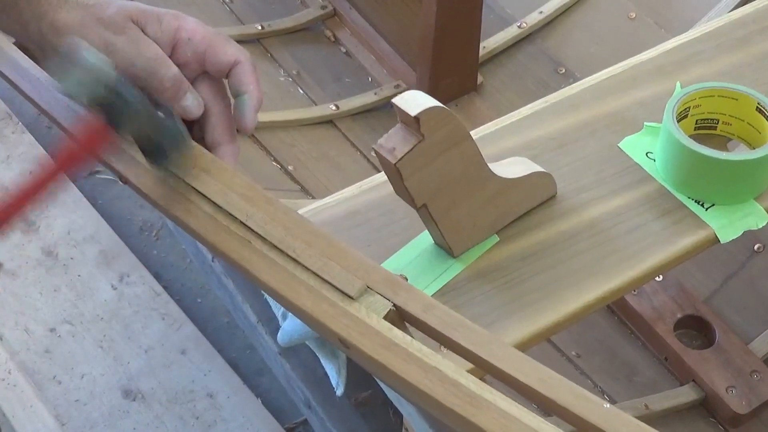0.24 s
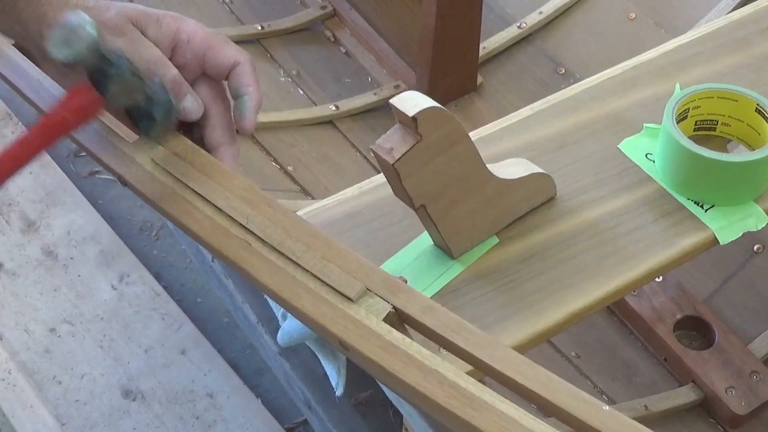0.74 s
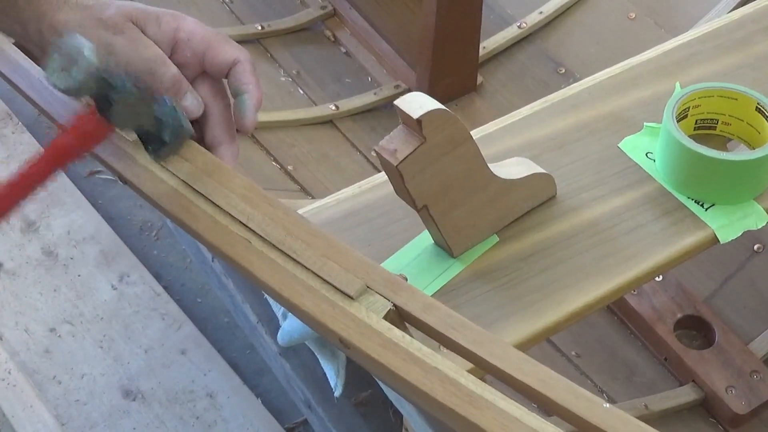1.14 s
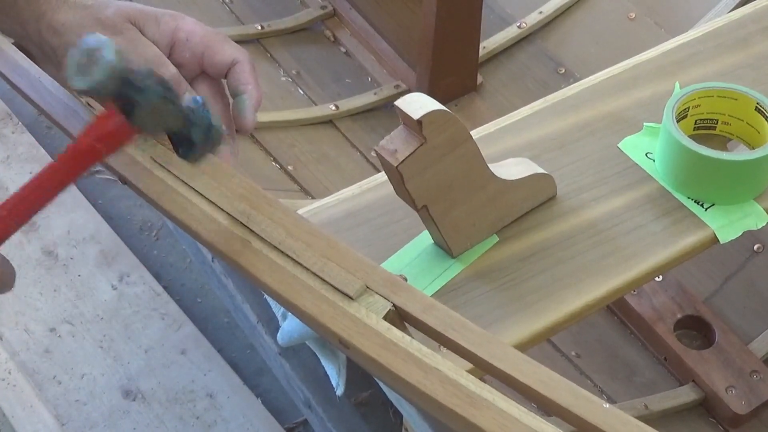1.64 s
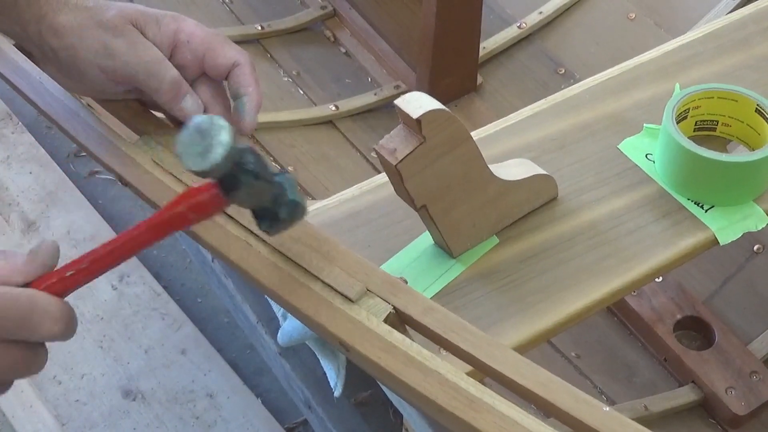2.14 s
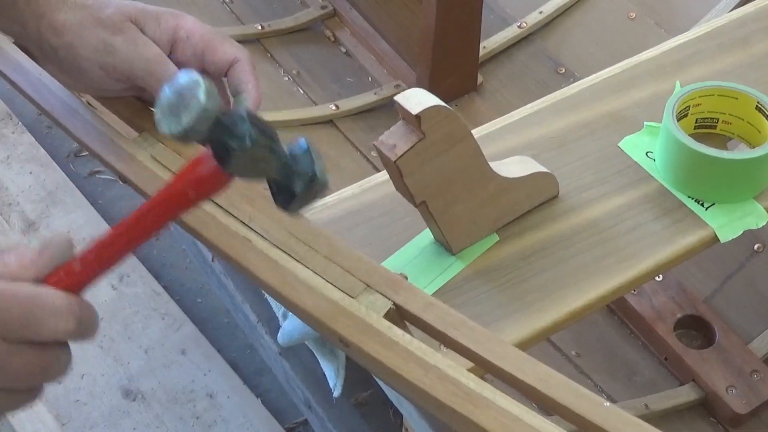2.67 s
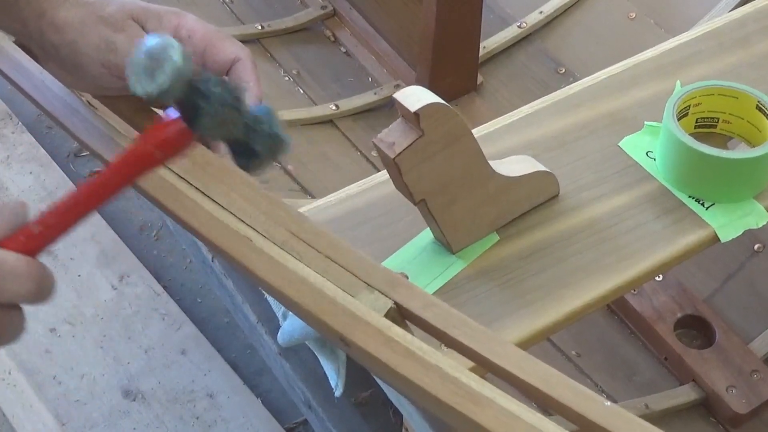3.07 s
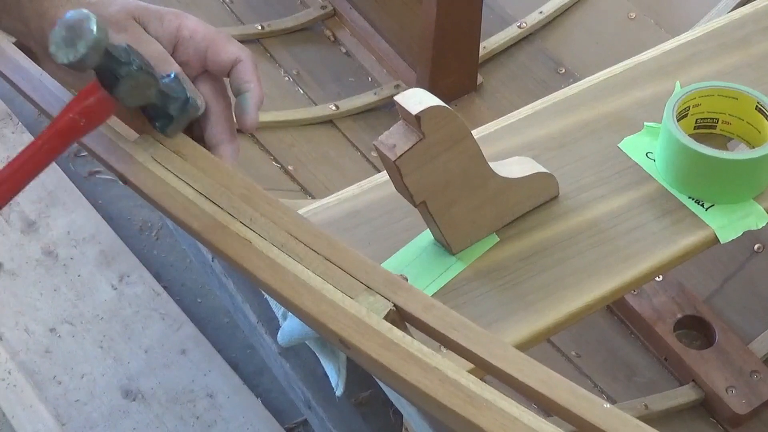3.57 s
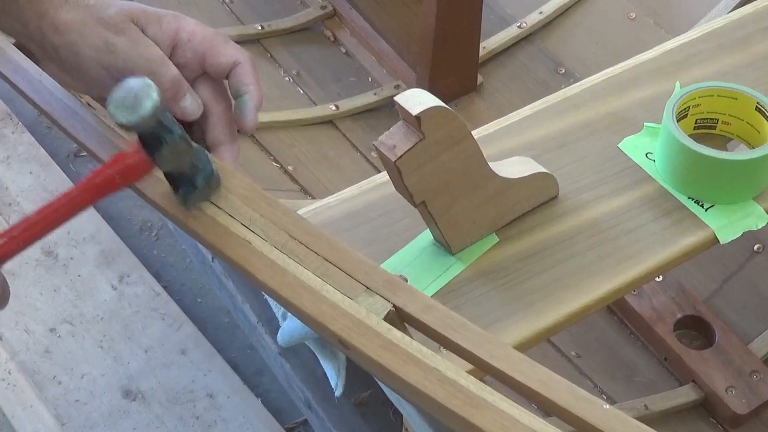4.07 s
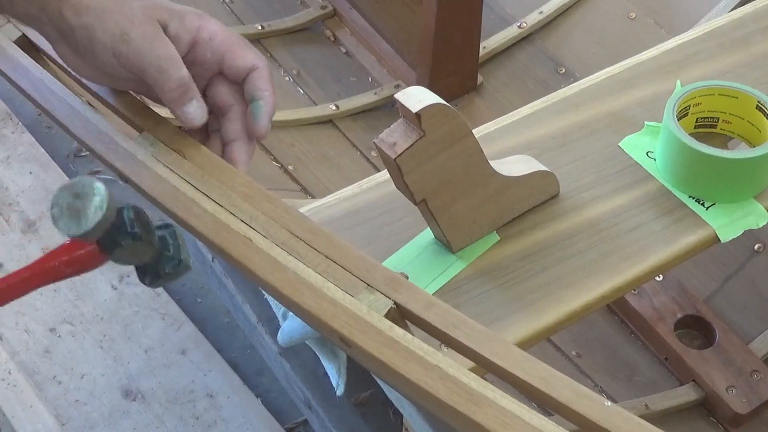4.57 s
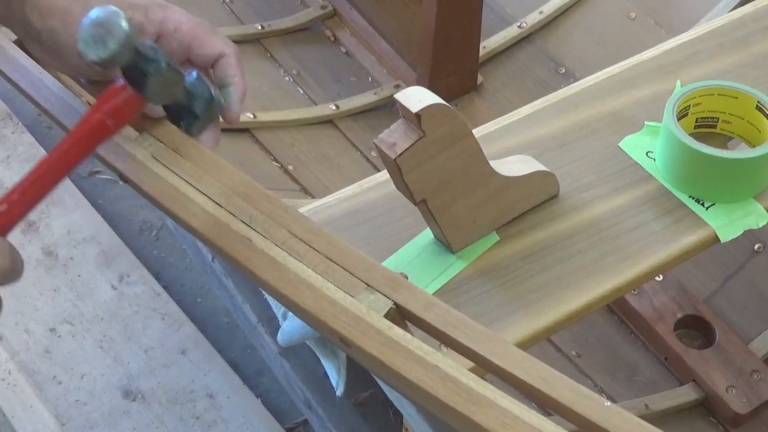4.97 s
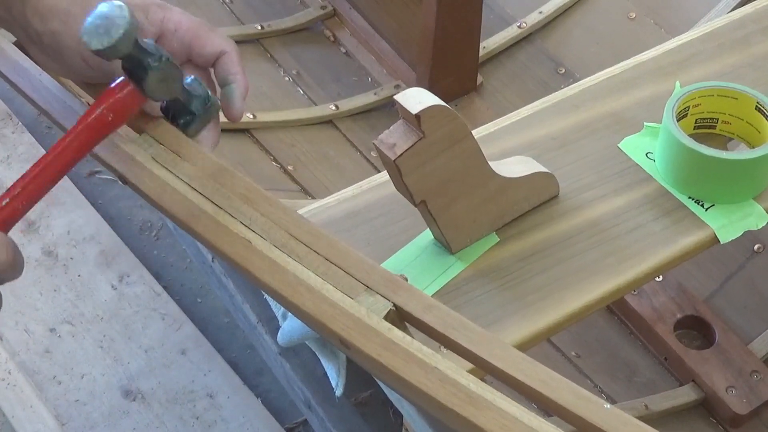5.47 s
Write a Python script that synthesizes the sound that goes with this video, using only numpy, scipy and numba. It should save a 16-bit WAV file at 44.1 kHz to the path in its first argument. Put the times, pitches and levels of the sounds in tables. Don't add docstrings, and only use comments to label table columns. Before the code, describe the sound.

Close, loud, uneven hammer blows on dense wood, each a bright crack and woody knock ringing through a hollow wooden hull in a quiet workshop.

```python
import sys
import numpy as np
from scipy import signal
from scipy.fft import rfft, irfft, next_fast_len
from scipy.io import wavfile
from scipy.ndimage import map_coordinates
from numba import njit

SR = 44100
rng = np.random.default_rng(int(sys.argv[2]) if len(sys.argv) > 2 else 0)


def output_pcm(signal):
    pcm = np.clip(np.atleast_2d(signal).T, -1, 1) * 32767
    wavfile.write(sys.argv[1], SR, np.round(pcm).astype(np.int16))


def nominal_scale(level):
    x = np.asarray(level, float) / 20
    return 10 ** x


N = 251811

# (time [s], hull boom [dB], plank knock [dB], sharpness of the steel edge [dB],
# pitch of the loose plank under the spot [Hz])
BLOWS = [(0.2981, 4.5, 9.5, 16, 3100), (0.6383, 3, 7, 14, 1500), (0.9629, 2, 5, 11, 5560),
         (1.2267, 8, 3.5, -1, 1602), (1.4924, 6.5, 3, 5, 2280), (1.7864, 5, 2, 7.5, 2540),
         (2.1048, 6, 0, 14.5, 783), (2.4451, 8.5, 12, 9.5, 800), (2.809, 8, 11.5, 10.5, 850),
         (3.342, 5, 3, 15, 754), (3.7221, 4.5, 4, 0, 783), (3.9384, 5.5, 7, -0.5, 2480),
         (4.1089, 3.5, 10, -6, 2020), (5.0908, 8.5, 2.5, 9, 1650), (5.3737, 5.5, -1.5, 5.5, 1565),
         (5.6247, 5.5, -2.5, 4.5, 1660)]
# (frequency [Hz], rise time [s])
RISE = [(100, 0.0067), (400, 0.015), (1500, 0.0019), (6000, 0.00033)]
EDGE_GROWS = 0.16


def unit(x):
    return x / np.sqrt(np.mean(x ** 2) + 1e-20)


def along(points, hz):
    f, v = np.transpose(points)
    return np.interp(np.log(hz + 1), np.log(f + 1), v)


def filtered(x, response):
    m = next_fast_len(x.shape[-1] + 4096)
    spectrum = rfft(x, m) * response(np.fft.rfftfreq(m, 1 / SR))
    return irfft(spectrum, m)[..., :x.shape[-1]]


def spread(pair):
    # (frequency [Hz], correlation [0 to 1])
    alike = [(30, .55), (70, .945), (150, .978), (500, .98), (1000, .966), (2000, .94), (8000, .91)]

    def shares(hz):
        turn = np.arccos(np.clip(along(alike, hz), 0, 1)) / 2
        return np.array([np.cos(turn), np.sin(turn)])

    mid, side = filtered(pair, shares)
    return np.array([mid + side, mid - side])


def shop():
    # (frequency [Hz], level [dB per Hz])
    air_colour = [(15, -40), (30, -25), (50, -26.5), (68, 3.5), (105, -15.5), (155, -1.5), (300, -12.5),
                  (800, -16.5), (1500, -20.5), (2200, -24.5), (4000, -33.5), (6200, -34), (10600, -44),
                  (11500, -60)]
    drift = map_coordinates(rng.standard_normal(60), [np.arange(N) * 7 / SR])
    air = filtered(rng.standard_normal((2, N)), lambda hz: nominal_scale(along(air_colour, hz)))
    return nominal_scale(-55.5 + 1.2 * drift) * spread(unit(air))


def block(knock_db, sharp_db):
    return -0.67 + 0.34 * knock_db + 0.35 * sharp_db


def reach(hz, boom_db, knock_db, sharp_db, plank_hz):
    block_db = block(knock_db, sharp_db)
    slope = [(120, boom_db + 0.34),
             (220, boom_db + 0.97 - 0.27 * knock_db),
             (320, boom_db), (430, boom_db), (580, knock_db), (1700, block_db),
             (2500, 0.46 * (block_db + sharp_db) - 0.94),
             (5500, sharp_db), (9000, (1 + EDGE_GROWS) * sharp_db - 1.5)]
    head = 0.089 * sharp_db * np.exp(-(np.log((hz + 1) / 5790) / 0.08) ** 2)
    loose_plank = 4 * np.exp(-(np.log((hz + 1) / plank_hz) / 0.29) ** 2)
    return along(slope, hz) + head + loose_plank


def crack(t, block_db, edge_db):
    # (frequency [Hz], level [dB])
    grit_colour = [(200, -24), (1000, -10), (2500, 2.5), (4200, 2.5), (6000, 6.5), (8500, -5.5),
                   (11000, -10)]
    # (frequency [Hz], level [dB], time to fall 60 dB [s])
    face = [(1710, -7, 0.0047), (2770, -19, 0.0028), (6040, 0, 0.0029), (8540, -8.5, .004)]
    tilt = [(1700, block_db), (2800, 0.00086), (6500, 0.008), (8500, edge_db)]

    burst = 0
    for start, db, t60 in [(0, 18.5, 0.0038), (0.002, -10, 0.015)]:  # s, dB, s
        burst = burst + nominal_scale(db - 60 * np.abs(t - start) / t60) * (t >= start)
    noise = burst * rng.standard_normal((2, len(t)))
    grit = filtered(noise, lambda hz: nominal_scale(along(grit_colour, hz) + along(tilt, hz)))

    hz, db, t60 = np.transpose(face)[:, :, None]
    luck = rng.standard_normal((2, len(hz), 3))
    level = nominal_scale(db + along(tilt, hz) + 2 * luck[..., :1] - 60 * t / t60)
    pitch = hz * (1 + 0.075 * luck[..., 1:2])
    cycles = np.sum(level * np.sin(2 * np.pi * (pitch * t + luck[..., 2:])), axis=1)

    onset = (1 - np.exp(-t / 0.00024)) ** 2
    x = (cycles + nominal_scale(0.5) * grit / np.abs(grit[0]).max()) * onset
    return x + nominal_scale(-8.5) * np.roll(x, round(0.003 * SR), axis=1)


def plank(t, plank_hz, block_db):
    # (share of the plank's pitch [ratio], level [dB], time to fall 60 dB [s])
    tones = [(.93, -12.5, 0.052), (1.01, -9, 0.043), (1.08, -10, 0.037)]
    share, db, t60 = np.transpose(tones)[:, :, None]
    turn = np.array([[[0]], [[0.25]]])
    off_pitch_db = 7 * abs(np.log2(plank_hz / 1600))
    level = nominal_scale(db + block_db - off_pitch_db - 60 * t / t60)
    tone = np.sin(2 * np.pi * (share * plank_hz * t + turn * share))
    return np.sum(level * tone, axis=1) * (1 - np.exp(-t / 0.0015))


def hull(t, drive):
    # (frequency [Hz], level [dB], time to fall 60 dB [s])
    modes = [(113, -14, 0.4), (159.2, -2.5, 0.37), (185.8, -7.5, 0.5), (210.8, -1.5, 0.34),
             (256.8, -10, 0.57), (324, 0, .45), (388.5, -4, 0.35), (435, -5, 0.37), (509, -9.5, 0.43),
             (560, -9, 0.37), (622, -4.5, 0.33), (681, -8.5, 0.35), (783, -5.5, 0.29), (1022, -16, 0.49),
             (1326, -12.5, .35), (1534, -13.5, 0.15), (914, -31.5, 0.089), (1185, -17, 0.36),
             (1743, -16, 0.31), (2970, -23.5, 0.1), (3380, -27, 0.1)]
    hz, db, t60 = np.transpose(modes)[:, :, None]
    luck = rng.standard_normal((2, len(modes), 3))
    hz = hz * (1 + 0.0077 * luck[..., :1])
    level = nominal_scale(db + drive(hz) + 2.4 * luck[..., 1:2] - 60 * t / t60)
    rise = 1 - np.exp(-t / (1.4 * along(RISE, hz)))
    return np.sum(level * rise ** 2 * np.sin(2 * np.pi * (hz * t + luck[..., 2:])), axis=1)


def ring(t, drive):
    # (frequency [Hz], level [dB per Hz])
    ring_colour = [(20, -63), (60, -27.5), (105, -9.5), (160, -3.5), (320, -1.5), (480, -7), (700, -11),
                   (1300, -18), (2400, -23), (3300, -27.5), (4700, -30), (5800, -34), (7200, -35),
                   (11000, -45.5)]
    # (frequency [Hz], time to fall 60 dB [s])
    ring_t60 = [(80, 0.51), (250, 0.44), (800, 0.45), (2500, 0.41), (6000, 0.37), (10500, .3)]
    # (frequency [Hz], width [Hz], level [dB])
    resonances = [(1440, 430, 2.5), (3160, 860, 2.5), (5830, 700, 4.5), (8300, 700, 1)]
    sing = 1 + 0.24 * rng.standard_normal(len(resonances))

    def colour(hz):
        db = along(ring_colour, hz)
        for strength, (centre, width, peak_db) in zip(sing, resonances):
            db = db + strength * peak_db / (1 + (2 * (hz - centre) / width) ** 2)
        return nominal_scale(db)

    noise = unit(filtered(rng.standard_normal((2, len(t))), colour))
    driven = filtered(noise, lambda hz: nominal_scale(drive(hz)))
    hz, s, z = signal.stft(driven, SR, nperseg=256, noverlap=224)
    rise = 1 - np.exp(-s / along(RISE, hz)[:, None])
    fade = nominal_scale(-60 * s / along(ring_t60, hz)[:, None])
    return signal.istft(z * rise * fade, SR, nperseg=256, noverlap=224)[1][:, :len(t)]


def hammer():
    # (time [s], hull boom [dB], plank knock [dB], sharpness [dB], plank pitch [Hz])
    earlier = [(-0.047, 4.4, 3.5, 11.4, 1200)]
    out = np.zeros((2, N + 2 * SR))
    t = np.arange(SR * 3 // 4) / SR
    for s, boom_db, knock_db, sharp_db, plank_hz in list(earlier) + list(BLOWS):
        drive = lambda hz: reach(hz, boom_db, knock_db, sharp_db, plank_hz)
        block_db = block(knock_db, sharp_db)
        square_db = 0.4 * (block_db - sharp_db)
        blow = nominal_scale(2 + 0.7 * sharp_db) * crack(t, square_db, -1.5 + EDGE_GROWS * sharp_db)
        blow = blow + plank(t, plank_hz, block_db)
        blow = blow + nominal_scale(-14.5) * hull(t, drive) + nominal_scale(-9.5) * ring(t, drive)
        out[:, round((s + 1.0004) * SR):][:, :len(t)] += spread(blow)
    return out[:, SR:SR + N]


def leading_hiss():
    # (frequency [Hz], level [dB])
    hiss_colour = [(100, -12.5), (500, 3), (1600, -2), (2600, -6.5), (4200, -5.5), (6200, -16), (6900, -26),
                   (11000, -32)]
    t = np.arange(N) / SR
    gate = np.zeros(N)
    for s, _, _, sharp_db, _ in BLOWS:
        fade_in = np.clip((t - s + 0.01) / 0.003, 0, 1)
        swell = 1 + 1.5 * np.clip((t - s) / 0.003 + 1, 0, 1)
        gate += nominal_scale(-43 + 0.51 * sharp_db) * fade_in * swell * (t < s + 0.003)
    hiss = filtered(rng.standard_normal((2, N)), lambda hz: nominal_scale(along(hiss_colour, hz)))
    return gate * spread(unit(hiss))


def scene():
    return shop() + hammer()


@njit
def follow(size, catch, let_go):
    held, now = np.empty_like(size), 0.
    for i in range(len(size)):
        now += (size[i] - now) * (catch if size[i] > now else let_go)
        held[i] = now
    return held


def limiter(x, top_db, attack, release, knee):
    held = follow(np.abs(x).max(axis=0), min(1, 1 / (attack * SR)), 1 / (release * SR))
    x = x / (1 + (held / nominal_scale(top_db)) ** knee) ** (1 / knee)
    return x / (1 + np.abs(x / 0.8) ** 5) ** (1 / 5)


def low_pass(x):
    return signal.sosfilt(signal.butter(12, 12170, fs=SR, output="sos"), x)


def record(dry):
    # (frequency [Hz], level difference [dB])
    lean = [(30, 1.2), (80, 2), (200, 1.6), (500, .6), (1000, .5), (2000, -.1), (8000, .4)]
    x = filtered(dry, lambda hz: nominal_scale(along(lean, hz) * np.array([[0.5], [-0.5]])))
    x = limiter(x, top_db=-3.5, attack=0.0002, release=0.021, knee=6.9)
    x = x + leading_hiss()
    x = filtered(x, lambda hz: 1 / (1 + (hz / 11110) ** 120))
    return low_pass(x)


dry = scene()
out = record(dry)
output_pcm(out)
```